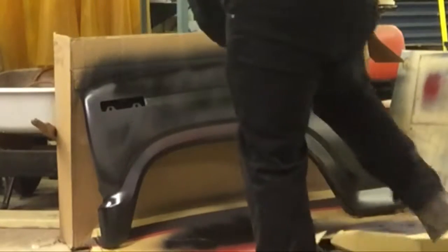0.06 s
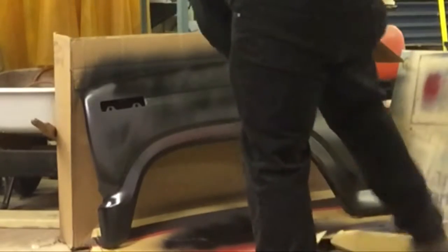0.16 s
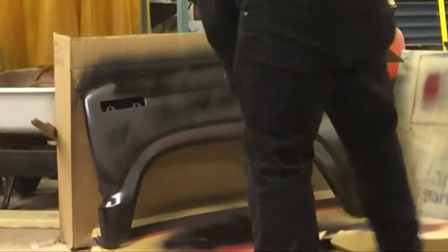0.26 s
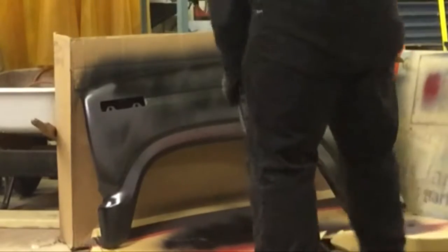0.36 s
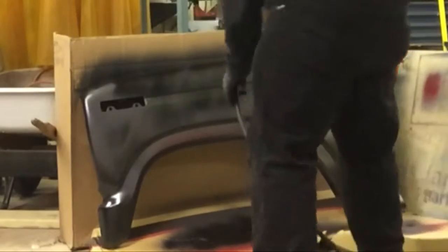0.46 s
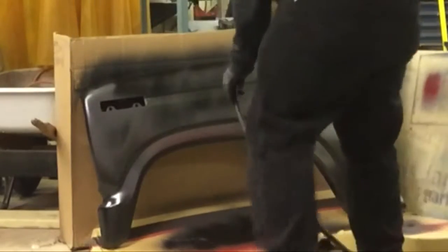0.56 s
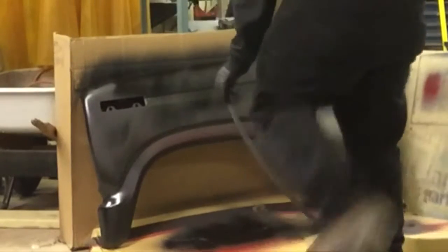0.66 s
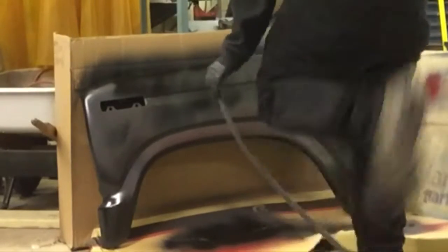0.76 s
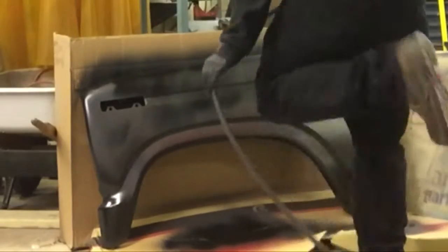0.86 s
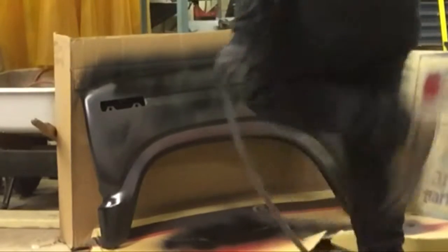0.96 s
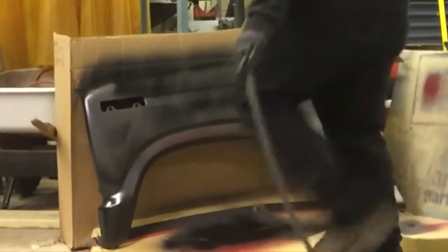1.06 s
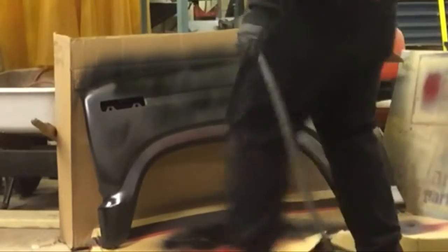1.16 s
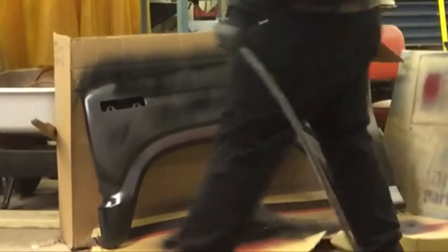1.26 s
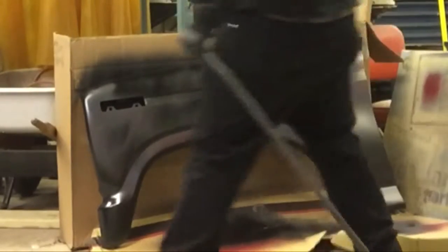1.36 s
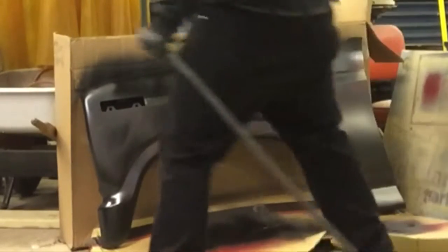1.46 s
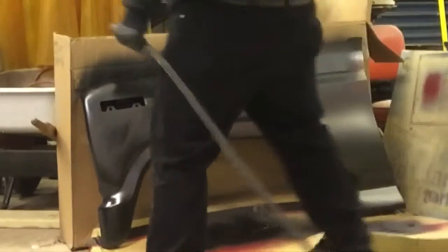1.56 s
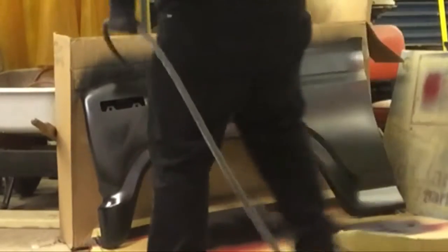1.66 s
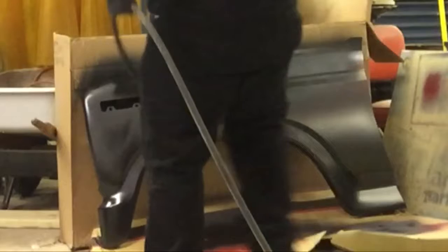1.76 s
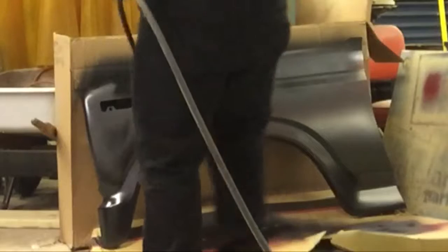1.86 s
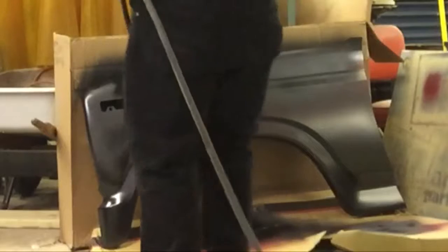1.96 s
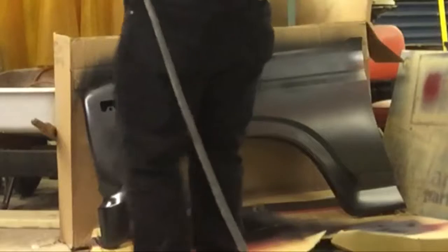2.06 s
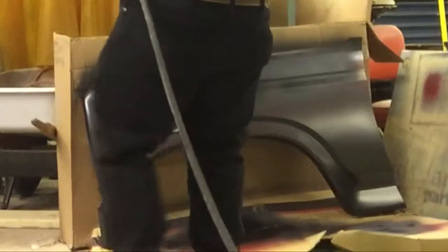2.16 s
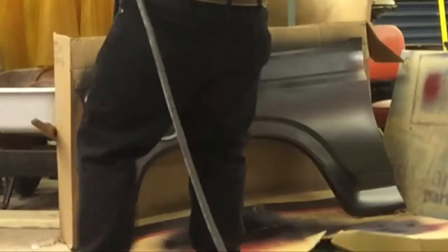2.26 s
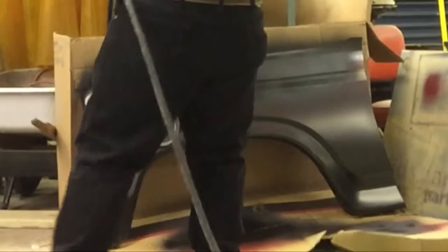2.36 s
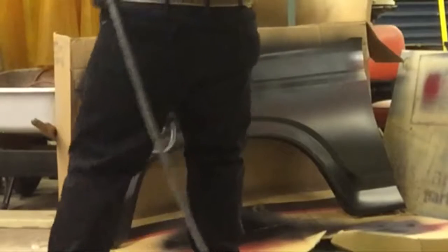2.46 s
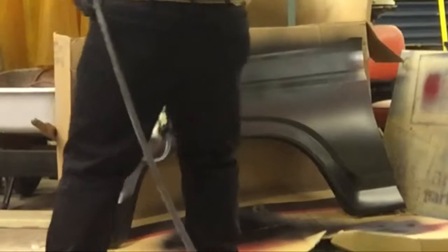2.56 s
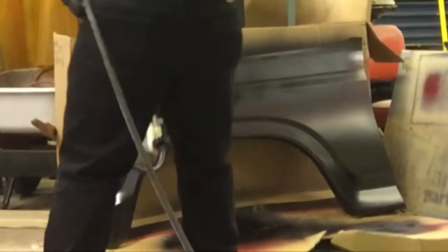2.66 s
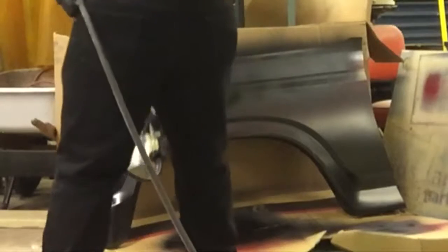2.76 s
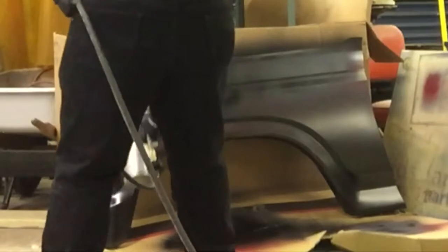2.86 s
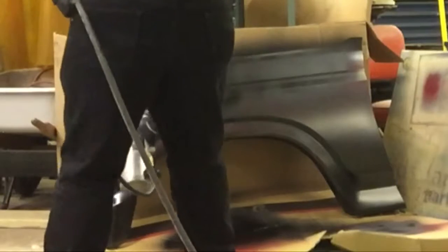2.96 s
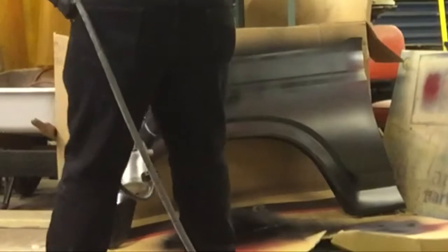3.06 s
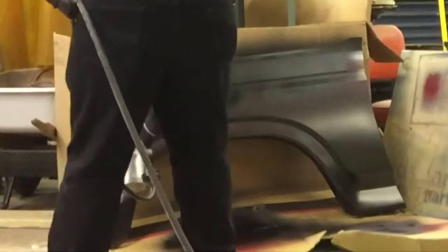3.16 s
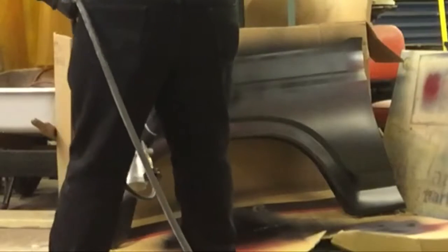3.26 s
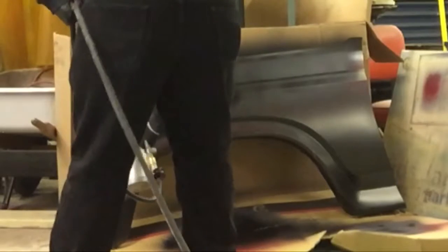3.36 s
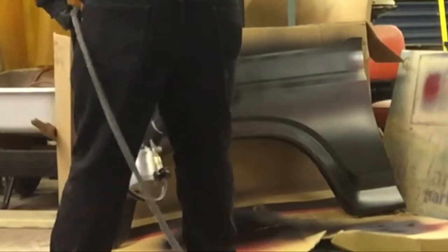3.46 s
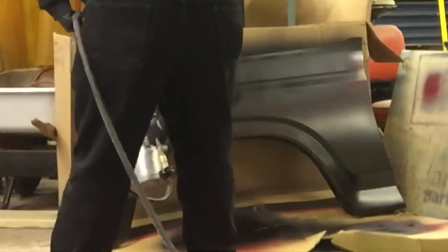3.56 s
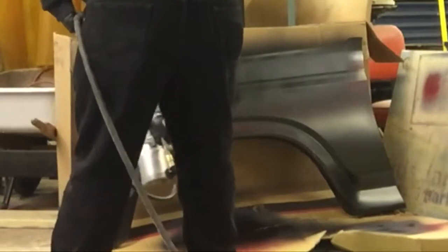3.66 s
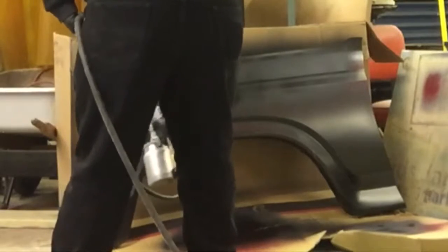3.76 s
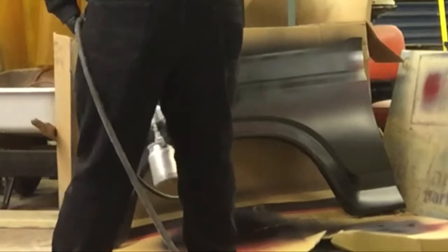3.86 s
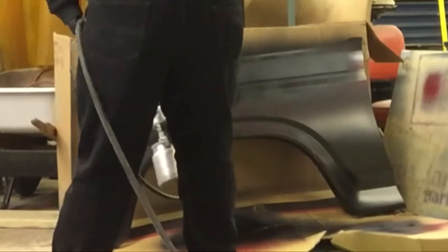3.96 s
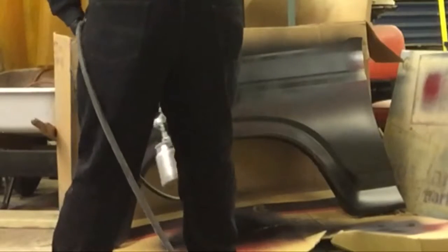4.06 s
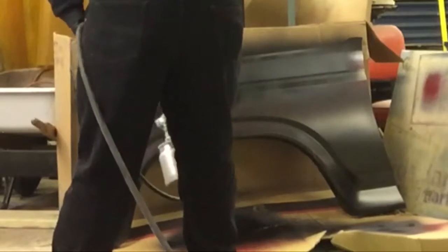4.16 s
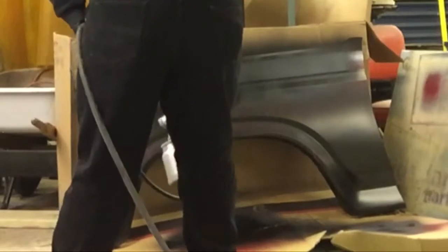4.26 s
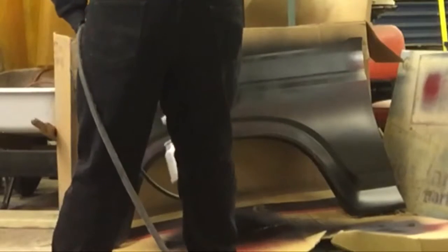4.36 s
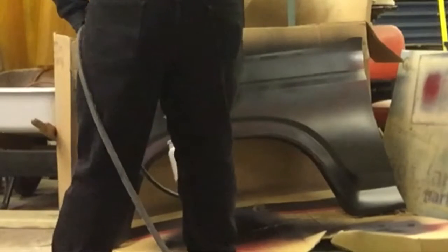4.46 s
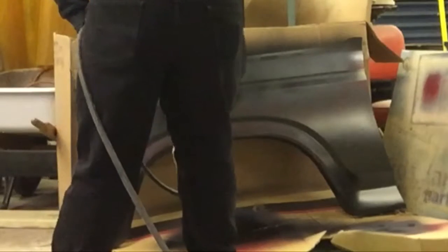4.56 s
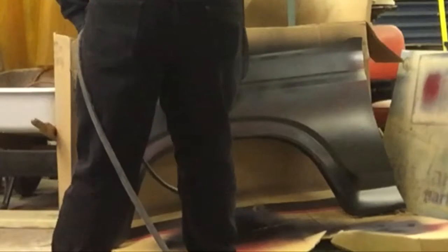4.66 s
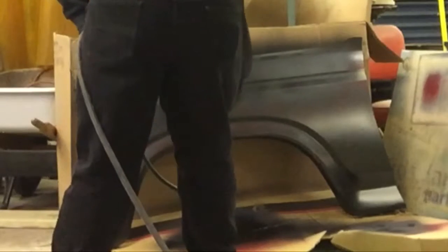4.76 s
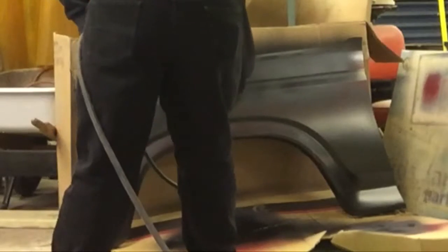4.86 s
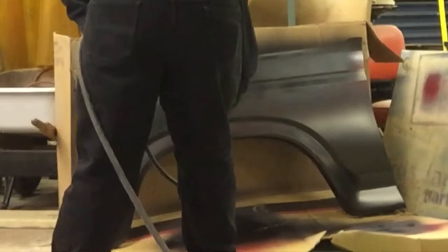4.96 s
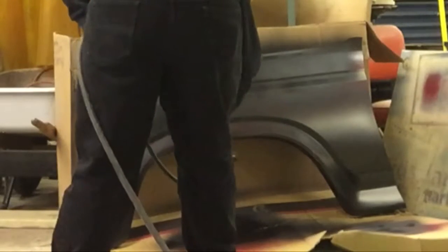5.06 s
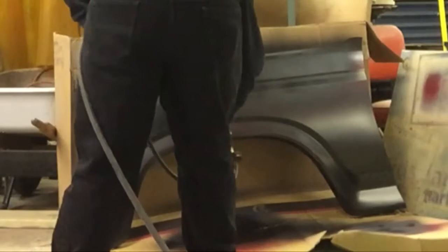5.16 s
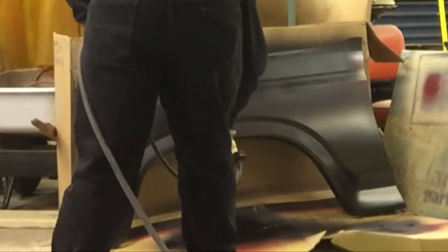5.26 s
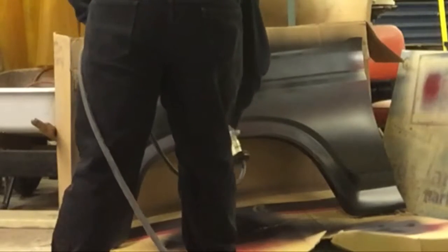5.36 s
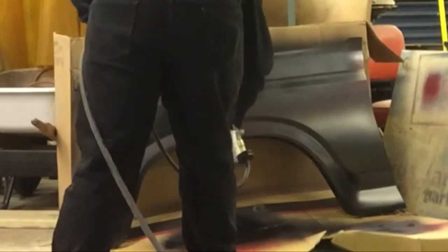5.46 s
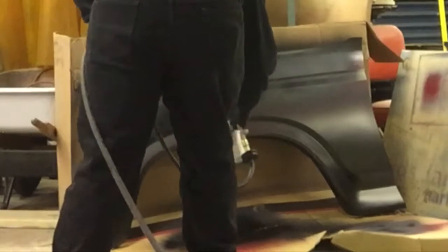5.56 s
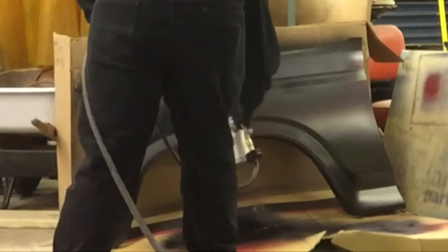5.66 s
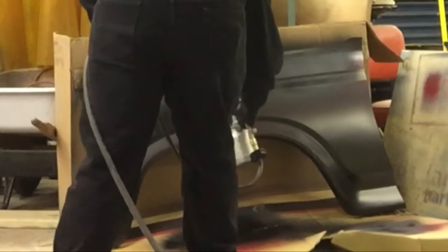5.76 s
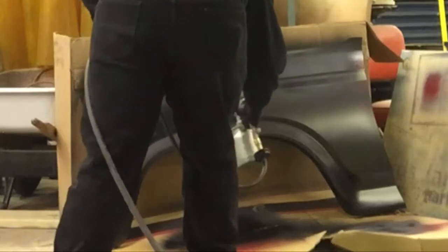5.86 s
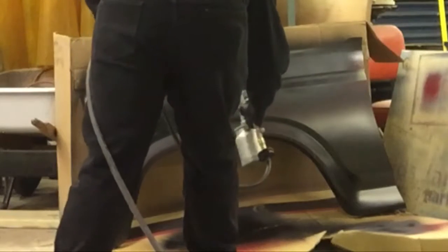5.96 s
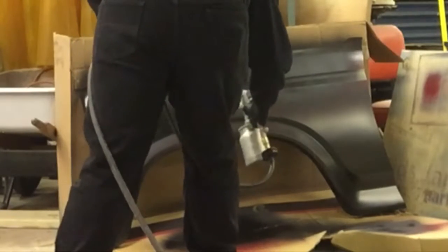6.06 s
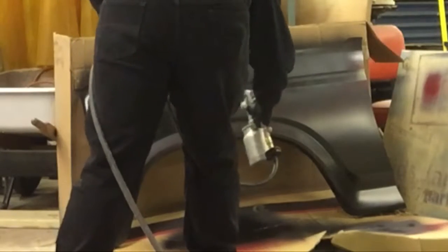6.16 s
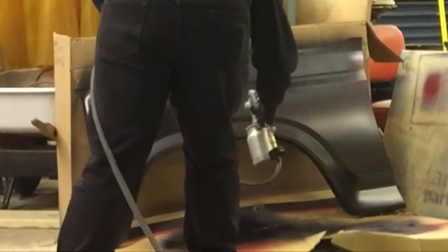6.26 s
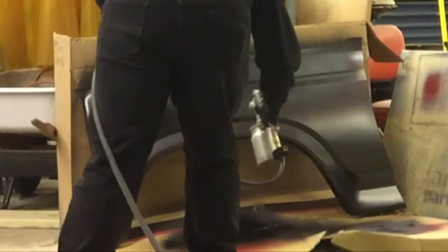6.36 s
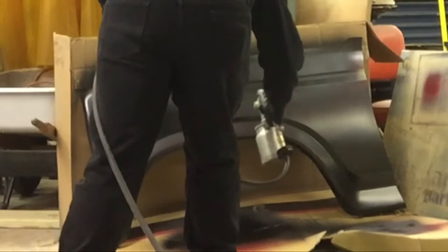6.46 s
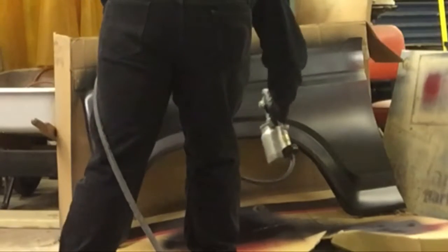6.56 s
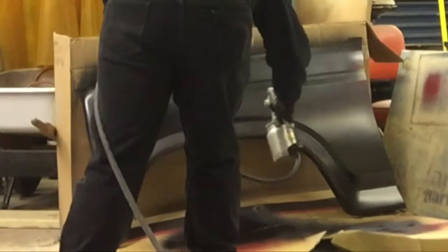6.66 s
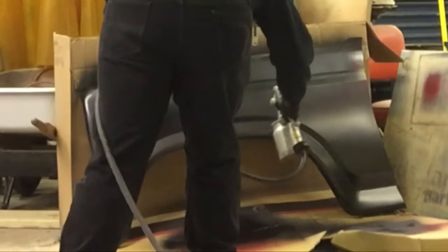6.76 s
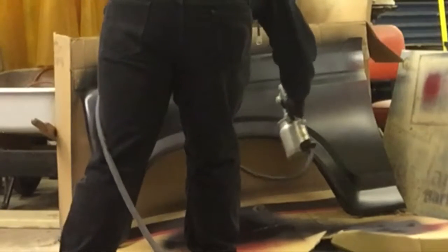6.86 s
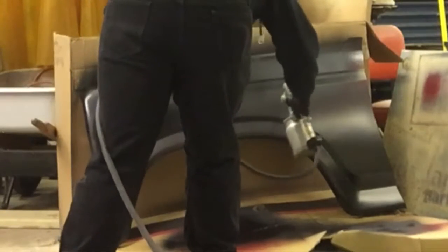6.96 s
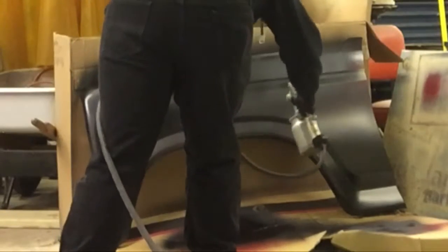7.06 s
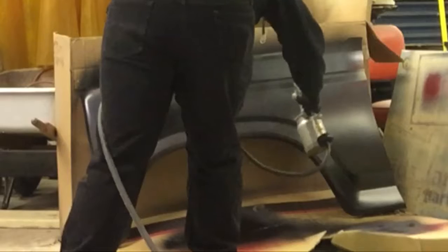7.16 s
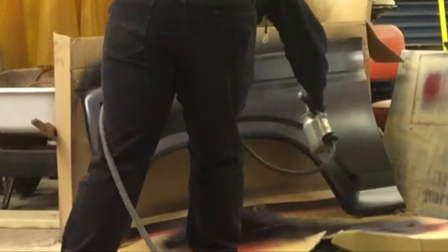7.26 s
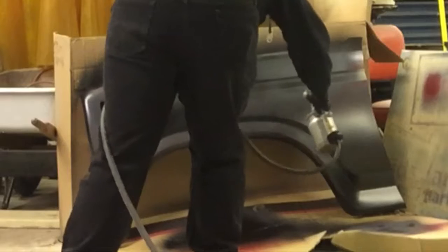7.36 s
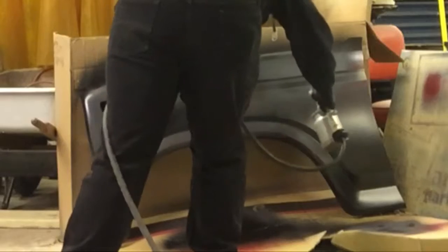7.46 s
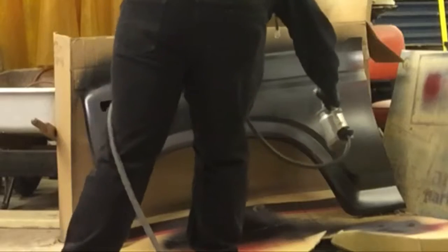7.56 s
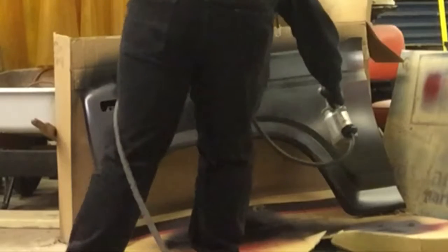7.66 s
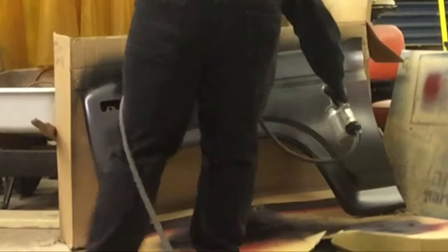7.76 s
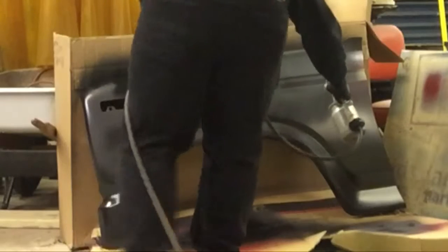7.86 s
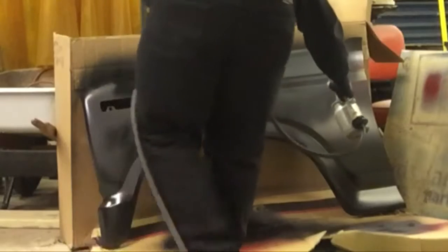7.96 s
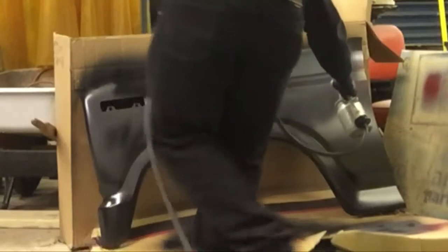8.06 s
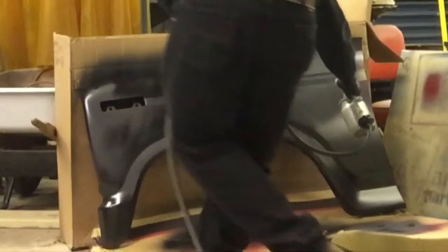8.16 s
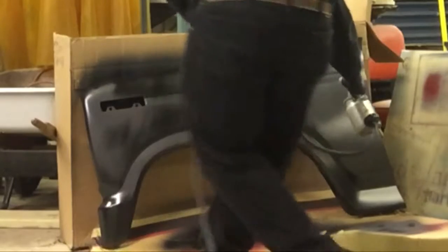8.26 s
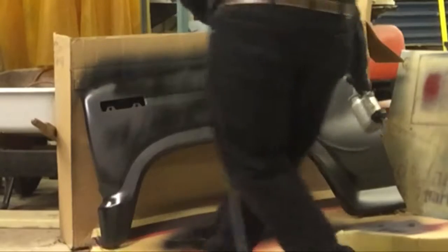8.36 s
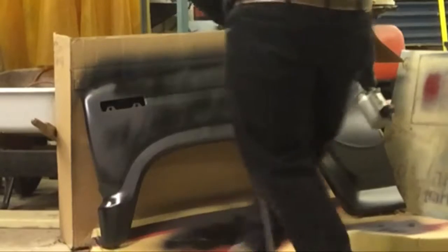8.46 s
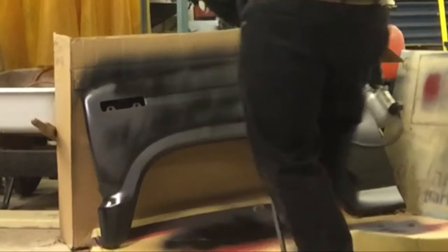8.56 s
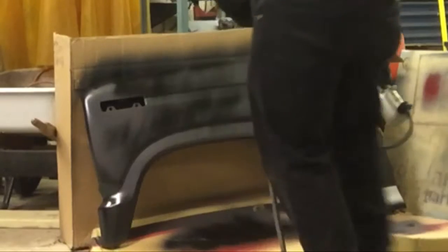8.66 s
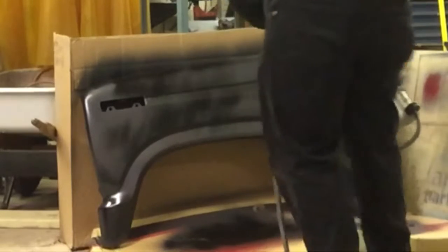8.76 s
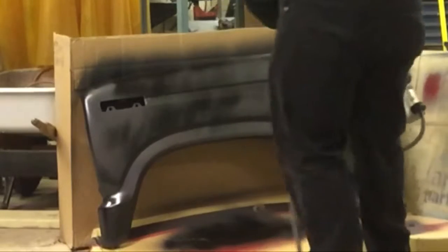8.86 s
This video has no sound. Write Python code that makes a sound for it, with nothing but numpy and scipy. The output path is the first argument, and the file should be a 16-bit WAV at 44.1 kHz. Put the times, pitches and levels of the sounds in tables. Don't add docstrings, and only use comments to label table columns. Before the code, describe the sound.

In a workshop, a compressor hums low and thumps rapidly, about thirteen strokes a second, with a faint air leak. Clothing and hose rustle and tick for the first two seconds. Just after three seconds a paint gun snaps open into a bright, rough hiss that stays on to the end, brightness shifting gently as the gun moves. Single camera microphone a few metres away, slightly gritty treble.

```python
import sys
import numpy as np
from scipy import signal
from scipy.fft import rfft, irfft, next_fast_len
from scipy.io import wavfile
from scipy.ndimage import uniform_filter1d, map_coordinates

SR = 44100
rng = np.random.default_rng(int(sys.argv[2]) if len(sys.argv) > 2 else 0)


def how_loud(loudness_db):
    steps = np.asarray(loudness_db, float) / 20
    return 10 ** steps


def to_wav(s):
    ch = np.atleast_2d(s).T
    pcm = np.round(np.clip(ch, -1, 1) * 32767)
    wavfile.write(sys.argv[1], SR, pcm.astype(np.int16))


N = 392490
STROKE_HZ = 12.9602
TRIGGER_S = 3.1995

# pitch_hz, level_db (per Hz)
CLOTH_COLOUR = [(3500, -13.5), (5000, -7), (6500, -1), (8500, 0), (11000, -2), (13500, -2), (15000, -19)]


def level(x, db):
    return x * how_loud(db) / np.sqrt(np.mean(x ** 2))


def tint(x, gain):
    size = next_fast_len(len(x))
    hz = np.arange(1, size // 2 + 2) * SR / size
    return irfft(rfft(x, size) * gain(hz), size)[:len(x)]


def shape(points, hz):
    at, db = np.transpose(points)
    return how_loud(np.interp(np.log(hz), np.log(at), db)) * np.minimum(hz / at[0], 1) ** 4


def slope(hz, edge_hz):
    return 1 / (1 + (edge_hz / hz) ** 8)


def walk(rate):
    hold = int(SR / rate)
    steps = np.repeat(rng.standard_normal(N // hold + 1), hold)
    smooth = uniform_filter1d(uniform_filter1d(steps, hold), hold)
    return 0.91 * smooth[:N]


def tones(hz, db):
    t = np.arange(N) / SR
    start = 2 * np.pi * rng.random(len(hz))
    return sum(np.sqrt(2) * how_loud(d) * np.sin(2 * np.pi * f * t + p) for f, d, p in zip(hz, db, start))


def shop():
    # pitch_hz, level_db (per Hz)
    shop_colour = [(30, -22), (48, 1), (68, 4.5), (100, -2), (170, -0.5), (290, -8.5), (400, -10),
                   (500, -18), (700, -16.5), (1000, -21), (2000, -26), (4500, -25), (8500, -31.5),
                   (14000, -38.5)]
    noise = level(tint(rng.standard_normal(N), lambda hz: shape(shop_colour, hz)), -30)
    high = tint(noise, lambda hz: slope(hz, 2200))
    low = noise - high
    return low * how_loud(0.39 * walk(1.14)) + high * how_loud(0.24 * walk(3.5))


def motor():
    # multiple of the motor rate, level_db
    shaft_tones = [(5, -47.5), (6, -39), (10, -63), (12, -42.5)]
    # middle_s, half_length_s, depth_db
    hum_dips = [(0.80, .04, -3), (1.485, 0.14, -10), (1.91, .07, -11), (2.445, .07, -5), (2.77, 0.043, -9),
                (3.82, .03, -4), (5.00, 0.053, -8), (6.40, 0.12, -6), (6.75, .09, -6), (7.05, 0.14, -7),
                (7.635, .06, -4), (8.253, 0.04, -3), (8.45, .06, -2)]
    motor_hz, whine_hz = 14.9, 942.76
    t = np.arange(N) / SR
    coarse = t[::100]
    dips = sum(db * np.exp(-((coarse - s) / half) ** 2) for s, half, db in hum_dips)
    sag_db = np.interp(t, coarse, dips)
    hum_db = -24.5 - 0.18 * t + sag_db + 1.1 * walk(5.)
    hum_phase = 2 * np.pi * 4 * motor_hz * t + .8 * walk(2.) + .2 * walk(12)
    hum = np.sqrt(2) * how_loud(hum_db) * np.sin(hum_phase)
    shake = 0.91 * np.sin(2 * np.pi * STROKE_HZ * t)
    whine = how_loud(-52.5) * np.sin(2 * np.pi * whine_hz * t + shake)
    return hum + whine + tones([k * motor_hz for k, db in shaft_tones], [db for k, db in shaft_tones])


def pump():
    # multiple of the stroke rate, level_db
    stroke_tones = [(6, -39), (7, -51), (8, -41), (10, -36), (11, -42), (12, -43), (13, -38), (15, -49),
                    (16, -48), (17, -47), (19, -51), (20, -49), (22, -46), (23, -43), (26, -48), (27, -45),
                    (28, -50), (29, -52), (31, -48), (34, -56), (36, -55), (38, -59), (47, -62), (52, -60),
                    (61, -59), (67, -58), (68, -59), (71, -56.5), (91, -62), (104, -62)]
    # pitch_hz, level_db
    knock_colour = [(60, -93), (300, -89), (450, -71), (750, -73.5), (1200, -66), (1500, -71), (2200, -75)]
    order = np.arange(4, 170)
    chance = rng.standard_normal((len(order), 2))
    size = shape(knock_colour, order * STROKE_HZ) * np.hypot(*chance.T) / np.sqrt(2)
    for k, db in stroke_tones:
        size[k - order[0]] = how_loud(db)
    spectrum = np.zeros(4097, complex)
    spectrum[order] = size * np.exp(1j * np.arctan2(*chance.T))
    cycle = irfft(spectrum) * 4096 * np.sqrt(2)
    turn = np.arange(N) / SR * STROKE_HZ + 0.0011 * walk(0.86)
    return map_coordinates(cycle, [turn % 1 * len(cycle)], order=1, mode="grid-wrap")


def rustle():
    # peak_s, rise_s, fall_s, level_db
    rubs = [(0.62, .01, .02, -56), (0.70, .03, .02, -59), (0.85, .07, .08, -47), (0.97, .07, .08, -43.5),
            (1.125, .012, 0.054, -38.5), (1.21, .03, .02, -47), (1.38, .025, .04, -47),
            (1.45, .015, .05, -49), (1.73, .02, .04, -49), (1.86, .016, .027, -40), (1.91, .005, .009, -42),
            (2.08, .03, .025, -51), (2.18, .07, .18, -45)]
    t = np.arange(N) / SR
    crackle = rng.standard_normal(N) * how_loud(3.2 * walk(380.0) + 1.6 * walk(90.))
    rub = level(tint(crackle, lambda hz: shape(CLOTH_COLOUR, hz)), 1.5)
    coarse = t[::20]
    swell = np.zeros(len(coarse))
    for peak, rise, fall, db in rubs:
        distance = np.where(coarse < peak, (peak - coarse) / rise, (coarse - peak) / fall)
        swell += how_loud(db) * np.exp(-distance ** 1.3)
    walking = how_loud(-56) * (t > 1.3) * (t < 2.6)
    return rub * np.maximum(np.interp(t, coarse, swell), walking)


def ticks():
    # start_s, peak_db
    snaps = [(0.9394, -29), (0.9694, -30), (1.1049, -28), (1.1184, -28), (1.3794, -33), (1.7294, -32),
             (1.9036, -27), (2.1794, -32)]
    t = np.arange(N) / SR
    fade = sum(how_loud(db) * (t > s) * np.exp(-np.maximum(t - s, 0) / 0.0055) for s, db in snaps)
    return fade * level(tint(rng.standard_normal(N), lambda hz: shape(CLOTH_COLOUR, hz)), -10.5)


def reflect(x):
    # mean_lag_ms, sway_ms, level_db
    echoes = [
        (.35, .1, -20),
        (1.3, .3, -22),
    ]
    n = np.arange(N)
    out = x.copy()
    for lag, sway, db in echoes:
        delay = (lag + sway * walk(.5)) * SR / 1000
        out += how_loud(db) * map_coordinates(x, [n - delay], order=3)
    return out


def gun():
    # pitch_hz, level_db (per Hz)
    jet_colour = [(1200, -25.5), (2000, -23), (3000, -19), (4300, -14), (4800, -9.5), (6500, -2.5),
                  (8500, -0.5), (10200, 0.5), (12300, 6.5), (13500, 4), (14500, 4.5), (15600, -1)]
    # time_s, level_db (of the jet core)
    aim = [
        (3.2, -19.5),
        (3.45, -20.5),
        (3.6, -18.5),
        (3.75, -20.5),
        (5.6, -21.5),
        (6.9, -19.5),
        (7.6, -17),
        (8.55, -18.5),
        (8.9, -20),
    ]
    opening_s = .0026
    t = np.arange(N) / SR
    since = np.maximum(t - TRIGGER_S, 0)

    core_db = np.interp(t, *np.transpose(aim)) + 2.5 * np.exp(-since / 0.12)
    turned_db = core_db + 20
    shear_db = -24 + 0.38 * turned_db
    paint_lag_db = -7 * np.exp(-since / 0.036)
    wetting_db = -4 * np.exp(-since / .5)
    panel_db = -31 + 0.15 * turned_db + paint_lag_db + wetting_db

    surge = .5 * walk(14.)
    spit = how_loud(0.61 * walk(900.) + 0.31 * walk(60.))
    jet = tint(reflect(rng.standard_normal(N) * spit), lambda hz: shape(jet_colour, hz))
    core = tint(jet, lambda hz: slope(hz, 10390))
    panel = tint(jet, lambda hz: 1 - slope(hz, 5150))
    shear = jet - core - panel

    tip = tint(core, lambda hz: slope(hz, 12500) ** 2)
    core = core + tip * (how_loud(1 - .5 * since) - 1)

    hiss = level(core, 0) * how_loud(core_db + .25 * walk(9.))
    hiss += level(shear, 0) * how_loud(shear_db + 0.1 * walk(15.0))
    hiss += level(panel, 0) * how_loud(panel_db + 0.72 * walk(18.0))
    valve = 1 / (1 + np.exp(np.clip((TRIGGER_S - t) / opening_s, -40, 40)))
    return hiss * how_loud(surge) * valve


def scene():
    duck = how_loud(-0.7 * np.clip((np.arange(N) / SR - TRIGGER_S) / 0.31, 0, 1))
    machines = (shop() + motor() + pump()) * duck
    return np.tile(machines + rustle() + ticks() + gun(), (2, 1))


def camera_rounding(x, size):
    # pitch_hz, step_db
    coarse = [(500, -25.5), (1500, -8.5), (3000, -1.5), (10000, 0.87), (15000, 3)]
    # pitch_hz, step_db
    masked = [(9000, -30), (13000, -8), (14300, -1), (15000, 3.5), (15700, 2), (15900, 20)]
    # pitch_hz, step_db
    quiet = [(6000, -28), (12000, -16), (13800, -14), (14500, -11.5), (15600, -9.5)]
    n = np.arange(2 * size) + .5
    window = np.sin(np.pi * n / (2 * size))
    basis = window[:, None] * np.cos(np.pi / size * np.outer(n + size / 2, n[:size]))
    frames = np.pad(x, (size, 2 * size - len(x) % size)).reshape(-1, size)
    lines = np.hstack([frames[:-1], frames[1:]]) @ basis
    hz = n[:size] * SR / (2 * size)
    bands = lines.reshape(len(lines), -1, 16)
    local = np.sqrt(uniform_filter1d(np.mean(bands ** 2, axis=2), size=3, axis=1))
    in_treble = (hz > 9000) & (hz < 14000)
    treble = np.sqrt(np.mean(lines[:, in_treble] ** 2, axis=1, keepdims=True))

    frame_db = 3.5 * uniform_filter1d(rng.standard_normal((len(lines), 1)), size=3, axis=0)
    supply_db = frame_db + 1.6 * rng.standard_normal(local.shape)
    centre = hz.reshape(-1, 16).mean(axis=1)
    step = np.maximum(local * shape(coarse, centre), treble * shape(masked, centre))
    step = np.maximum(step, shape(quiet, centre)) * how_loud(supply_db)
    step = step * np.minimum(4 * np.roll(treble, 2) / (treble + 1e-12), 1)
    step = np.repeat(step, 16, axis=1) + 1e-12
    rounded = np.sign(lines) * np.floor(np.abs(lines) / step + .4) * step
    back = rounded @ basis.T * 2 / size
    return (back[1:, :size] + back[:-1, size:]).ravel()[:len(x)]


def refill(x, count, frame, offset):
    out = x.copy()
    window = np.sin(np.pi * (np.arange(2 * frame) + .5) / (2 * frame))
    hz = np.arange(frame + 1) * SR / (2 * frame)
    for place, height in rng.random((count, 2)):
        start = offset + frame * int((N // frame - 3) * place ** 0.65)
        low_hz = 4100 + 9000 * height ** 1.51
        in_band = (hz > low_hz) * (hz < low_hz + 1500)
        band = rfft(x[0, start:start + 2 * frame] * window) * in_band
        scramble = np.exp(2j * np.pi * rng.random((2, frame + 1)))
        fresh = irfft(band * scramble) * np.sqrt(2) * window
        out[:, start:start + 2 * frame] += fresh - irfft(band) * window
    return out


def low_pass(x):
    return signal.sosfilt(signal.butter(12, 15760, fs=SR, output="sos"), x)


def record(dry):
    # pitch_hz, width_hz, level_db
    housing = [
        (7700, 330, -4),
        (9770, 820, -0.5),
        (16000, 1050, -4.5),
    ]

    def notches(hz):
        return how_loud(sum(db * np.exp(-((hz - mid) / width) ** 2) for mid, width, db in housing))

    heard = camera_rounding(tint(dry[0], notches), size=1024)
    mix = refill(np.tile(heard, (2, 1)), count=46, frame=1024, offset=654)
    return low_pass(mix)


dry = scene()
out = record(dry)
to_wav(out)
```